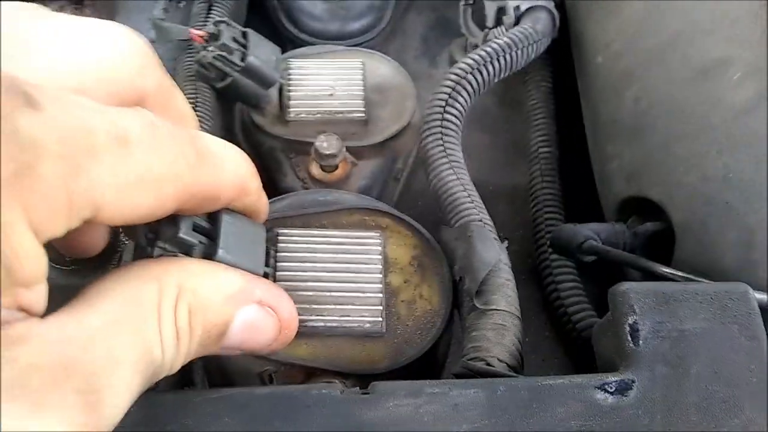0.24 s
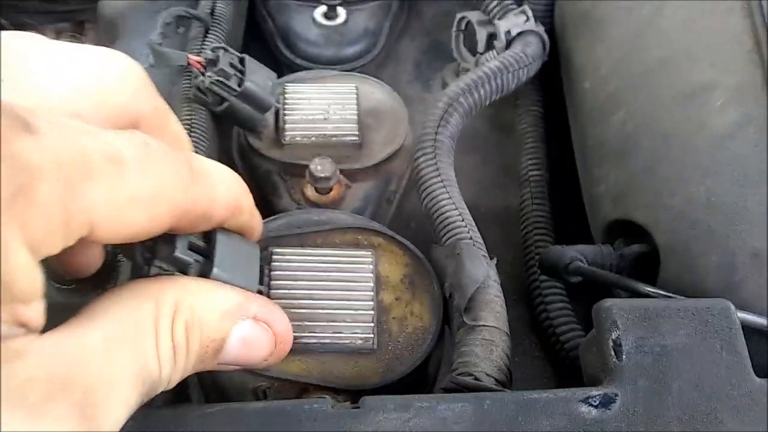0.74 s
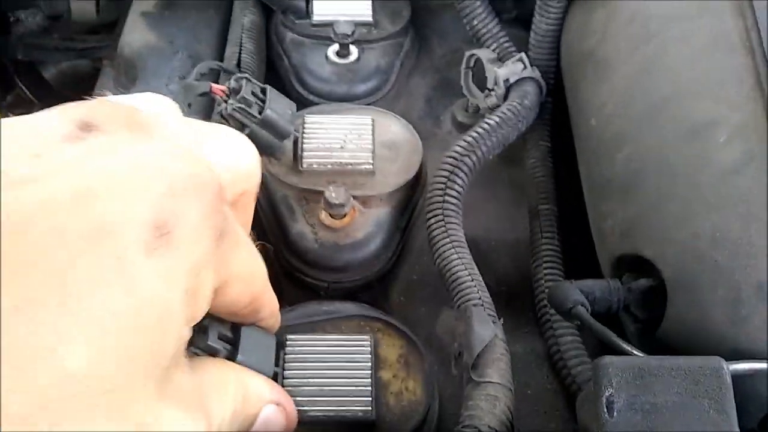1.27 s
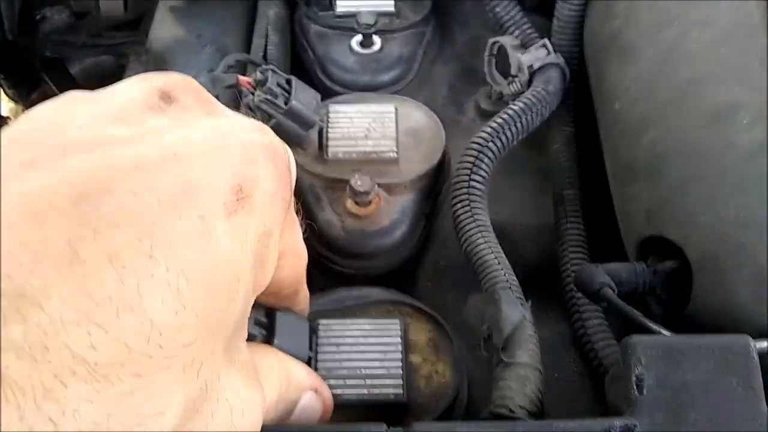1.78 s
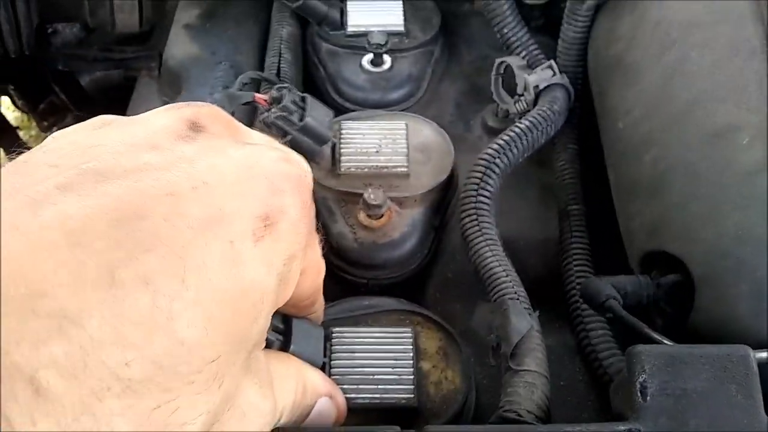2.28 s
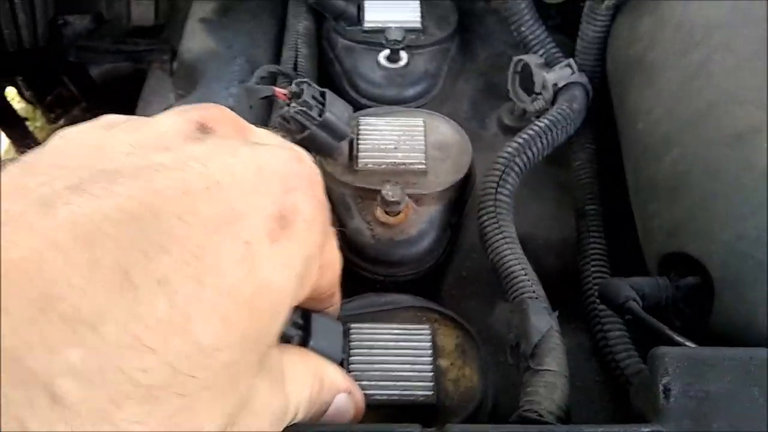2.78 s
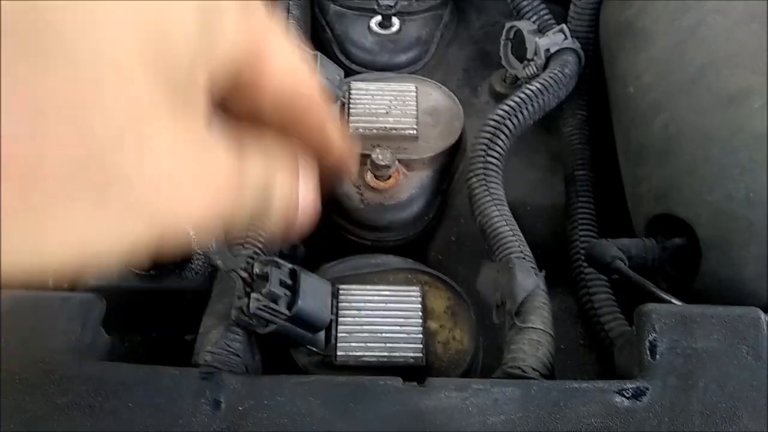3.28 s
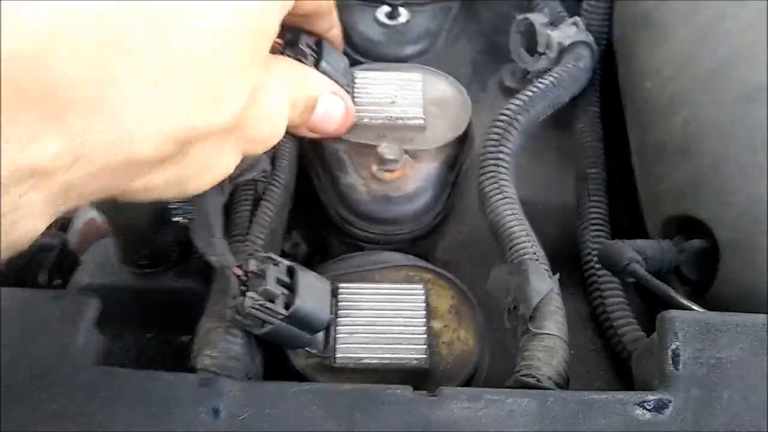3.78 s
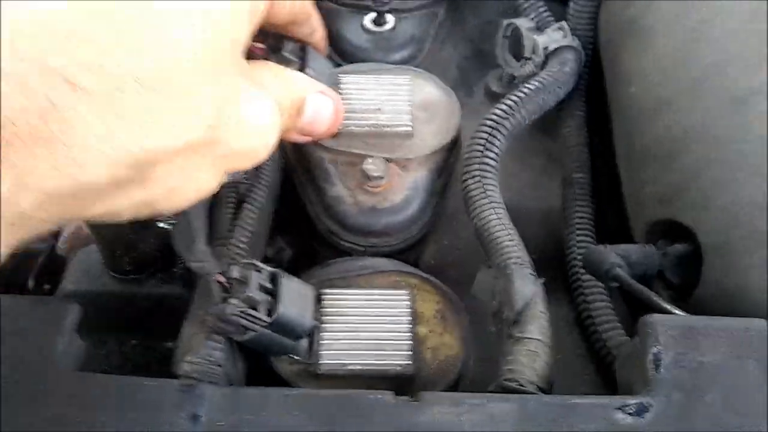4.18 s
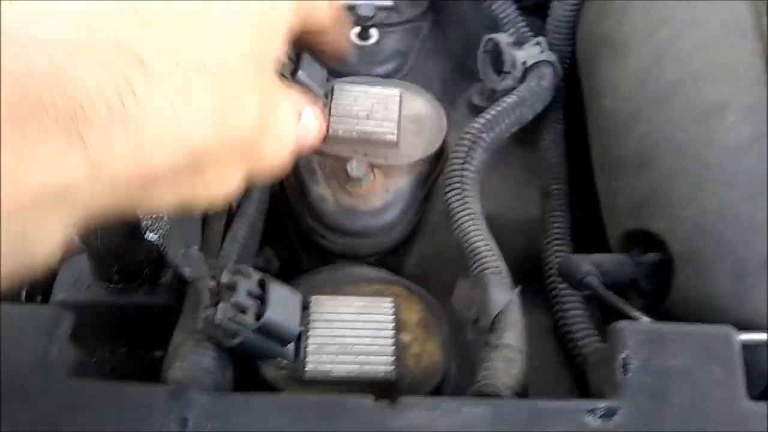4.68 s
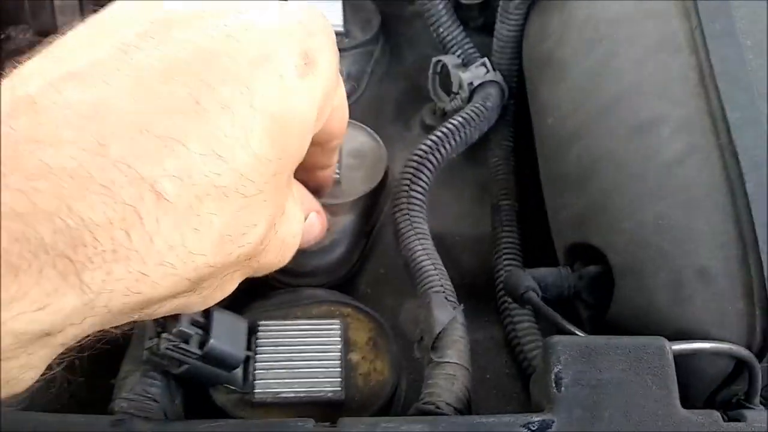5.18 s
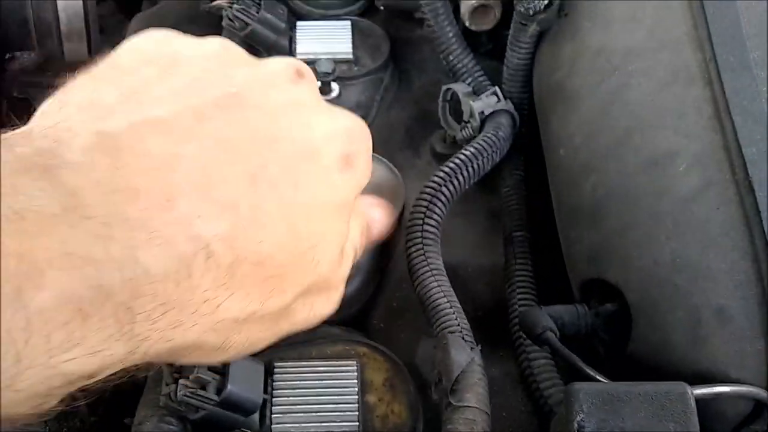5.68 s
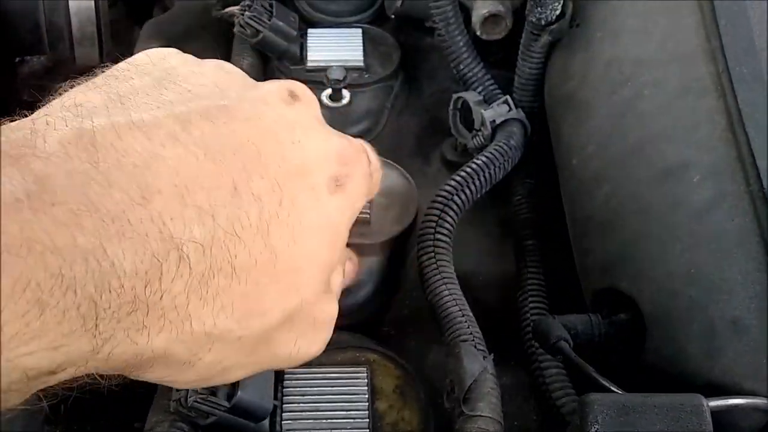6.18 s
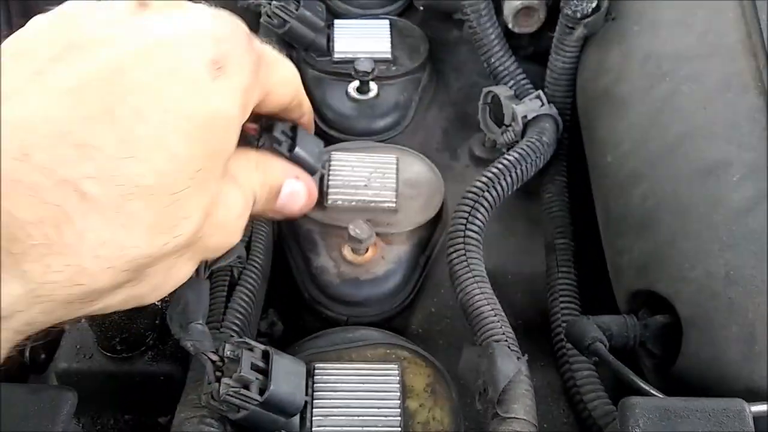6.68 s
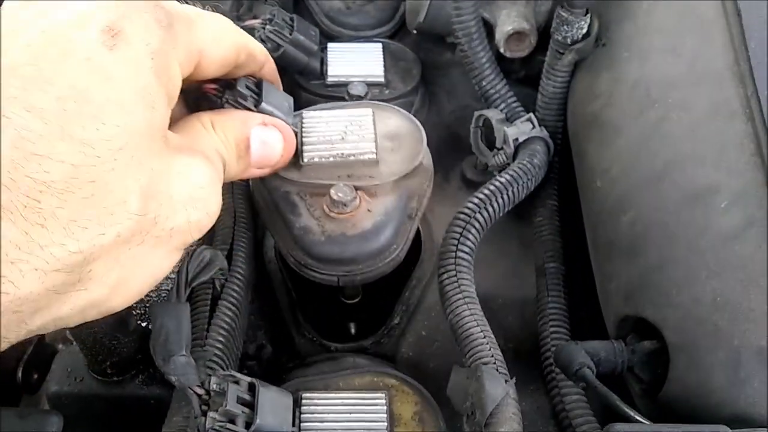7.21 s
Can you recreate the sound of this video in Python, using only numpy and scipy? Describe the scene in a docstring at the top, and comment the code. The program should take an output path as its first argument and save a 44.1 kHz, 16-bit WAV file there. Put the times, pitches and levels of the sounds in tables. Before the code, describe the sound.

A six-cylinder engine idles roughly at close range, valve gear ticking metallically, while sharp electric sparks snap in hollow wells and a plastic connector clicks home.

```python
"""A six-cylinder car engine idles unevenly under its open bonnet, close to a phone.
Its valve gear ticks around each firing and rings the cylinder head, over a throbbing exhaust note,
a droning block and hiss. A lifted ignition coil snaps sparks that ring its plug well, and rubber boots
pop. A connector clicks home, dull knocks stand out, and puffs of air touch one microphone.
The phone widens its stereo by feeding each microphone, late and inverted, to the other side."""
import sys
import numpy as np
from scipy import signal
from scipy.fft import rfft, irfft, next_fast_len
from scipy.io import wavfile
from scipy.ndimage import uniform_filter1d, map_coordinates

SR = 44100
rng = np.random.default_rng(int(sys.argv[2]) if len(sys.argv) > 2 else 0)


def unload_audio(sound):
    """Save the sound as a 16-bit wav file, at the path given as the first command line argument."""
    columns = np.transpose(np.atleast_2d(sound))
    # keep every value between -1 and 1, then stretch to whole-number steps
    steps = np.round(np.clip(columns, -1, 1) * 32767)
    wavfile.write(sys.argv[1], SR, steps.astype(np.int16))


N = 328545  # length in samples
CYLINDERS = 6  # each fires once a cycle
TICK_RISE = .72  # a tick rises in this share of the time that it takes to die

# How far the deeper misfire has set in. Each row: time in seconds, share from 0 to 1.
MISFIRE = [(0, 0), (3.2, 0), (3.9, 1), (7.45, 1)]


def amp(db):
    """Turn decibels into an amplitude factor."""
    return 10 ** (np.asarray(db) / 20)


def unit(x):
    """Scale a sound to an average power of one."""
    return x / np.sqrt(np.mean(x ** 2) + 1e-20)


def along(points, hz):
    """Read a curve of (Hz, value) points on a logarithmic frequency axis."""
    f, v = np.transpose(points)
    return np.interp(np.log(hz + 1), np.log(f + 1), v)


def curves(rows):
    """Give one value per sample for each column after the time."""
    s, *cols = np.transpose(rows)
    return [np.interp(np.arange(N) / SR, s, c) for c in cols]


def wobble(rate):
    """A smooth random curve with this many random points a second."""
    points = rng.standard_normal(int(N * rate / SR) + 4)
    return map_coordinates(points, [np.arange(N) * rate / SR])


def filtered(x, response):
    """Multiply the spectrum of x by a response that depends on frequency."""
    m = next_fast_len(N + SR // 2)
    return irfft(rfft(x, m) * response(np.fft.rfftfreq(m, 1 / SR)), m)[..., :N]


def coloured(x, spectrum):
    """Shape a sound with a curve of (Hz, dB) points."""
    return filtered(x, lambda hz: amp(along(spectrum, hz)))


def resonances(modes):
    """Response of parts that ring after a blow, from (Hz, width in Hz, dB) modes of alternating sign."""
    def response(f):
        total = 0
        for k, (centre, width, db) in enumerate(modes):
            ring = 1j * f * width / (centre * centre - f * f + 1j * f * width)
            total = total + (-1) ** k * amp(db) * ring
        return total
    return response


def pair():
    """White noise at two microphones, nearly alike in the bass because long waves reach both together."""
    # Each row: frequency in Hz, likeness at the two microphones from 0 to 1.
    likeness = [(60, 0.99), (180, 0.97), (400, 0.99), (600, 0.73), (1500, .02), (2200, 0.34), (3000, 0.062),
                (5500, 0.062), (6700, 0.17), (14000, 0.14)]

    def split(hz):
        angle = np.arccos(np.clip(along(likeness, hz), -1, 1)) / 2
        return np.array([np.cos(angle), np.sin(angle)])

    mid, side = filtered(rng.standard_normal((2, N)), split)
    return np.array([mid + side, mid - side])


def bursts(times, db, width, rise=1):
    """Envelope of short bursts that fall over a time set by width (s) and swell in rise times that."""
    power = np.bincount(np.round(times * SR).astype(int), amp(db) ** 2, N)[:N]
    t = np.arange(-2000, 2001) / SR
    shape = np.exp(-(t / np.where(t < 0, rise * width, width)) ** 2)
    return np.sqrt(np.abs(signal.fftconvolve(power, shape, "same")))


def turns(cycles, pattern):
    """A value that glides from cylinder to cylinder, and to a second pattern as the misfire deepens."""
    share = curves(MISFIRE)[0]
    place = [cycles % 1 * CYLINDERS]
    early, late = (map_coordinates(np.array(p, float), place, mode="grid-wrap") for p in pattern)
    return (1 - share) * early + share * late


def firings(cycles):
    """Number and time of each firing, found from the turning of the engine."""
    number = np.arange(2, int(cycles[-1] * CYLINDERS))
    return number, np.interp(number / CYLINDERS, cycles, np.arange(N) / SR)


def hiss(level_db):
    """Broad hiss that swells and sinks: coloured noise whose level flickers."""
    # Tone of the hiss. Each row: frequency in Hz, relative level in dB.
    tone = [(500, -49), (1500, 1.5), (2300, -4.5), (3000, 4), (5500, 9), (7000, -2.5), (10000, -4),
            (12500, -7.5), (14500, -73)]
    noise = pair() * amp(3.07 * wobble(30))
    return amp(level_db + 7) * unit(coloured(noise, tone))


def puffs():
    """Short low gusts of air: bursts of deep noise that reach the left microphone only."""
    # Each row: time in seconds, relative level in dB, width of the burst in seconds.
    gusts = [(1.68, -21, 0.0097), (3.47, -34, 0.025), (3.538, -29, 0.014), (3.595, -28, 0.018)]
    # Tone of the gusts. Each row: frequency in Hz, relative level in dB.
    tone = [(15, -24), (45, -2), (90, 1), (150, 2), (240, -6), (500, -59)]
    swell = sum(bursts(np.array([s]), [db], width) for s, db, width in gusts)
    return swell * unit(coloured(rng.standard_normal(N), tone)) * np.array([[1], [0]])


def connector():
    """A plastic connector snaps home: its latch rings briefly and rattles as it seats."""
    # Each row: time in seconds, relative level in dB.
    clicks = [(3.2349, -7.5), (3.2425, -12), (3.2496, -24), (3.2565, -23)]
    # Lower and upper edge of the rattle's band, in Hz.
    rattle_hz = [2190, 4560]
    out, t = np.zeros(N + SR), np.arange(SR // 10) / SR
    b, a = signal.butter(1, rattle_hz, 'bandpass', fs=SR)
    for s, db in clicks:
        ring = np.sin(2 * np.pi * 2200 * t) * amp(-60 * t / 0.011) * (1 - np.exp(-t / 0.00047)) ** 2
        rattle = signal.lfilter(b, a, rng.standard_normal(len(t)))
        rattle = rattle * amp(-12 - 60 * t / 0.097) * (1 - np.exp(-t / 0.0014))
        out[round(s * SR):][:len(t)] += amp(db + 14) * (ring + rattle)
    # from the side: half a wave apart at the two microphones
    return out[:N] * np.array([[-.4], [.6]])


def knocks():
    """Short dull knocks low in the block: bursts of coloured noise that stand out of the drone."""
    # Each row: time in seconds, relative level in dB.
    blows = [(1.536, -24), (4.529, -30), (4.759, -29), (5.348, -38), (5.581, -27), (5.78, -34),
             (6.147, -22.5), (6.57, -27), (6.74, -31), (6.903, -31), (7.336, -28)]
    # Tone of a knock. Each row: frequency in Hz, relative level in dB.
    tone = [(300, -19), (520, 7), (800, -5), (1080, 12.5), (1700, -12.5)]
    s, db = np.transpose(blows)
    return bursts(s, db, 0.0058, TICK_RISE) * unit(coloured(pair(), tone))


def block(cycles):
    """The block drones: noise beaten by every firing, in uneven lumps."""
    # Course of the drone. Each row: time in seconds, relative level in dB.
    drone = [(0.0, -29.5), (0.14, -34), (0.79, -33.5), (1.2, -30), (2.0, -29.5), (2.86, -29), (3.5, -31.5),
             (3.84, -29.5), (4.62, -32), (5.04, -29.5), (6.37, -31), (6.81, -29), (7.14, -34),
             (7.45, -32.5)]
    # Tone of the block. Each row: frequency in Hz, relative level in dB.
    tone = [(20, -0.5), (45, -5), (70, 3.5), (150, 2.5), (280, -7), (340, -5.5), (400, 2), (435, -3),
            (478, 0.5), (530, -2), (700, -5.5), (900, -8), (1050, -4.5), (1300, -8), (1500, -11.5),
            (2400, -16), (5000, -26)]
    # Loudness of each cylinder's turn. Two rows, before and after the misfire deepens: six values in dB.
    lump = [
        [-.6, 0.47, -2.5, -1.6, -1.8, 0.37],
        [1.5, 0.96, -2.5, -1.9, 0.72, 0.6],
    ]
    beat_db = 1.1 * np.cos(2 * np.pi * (CYLINDERS * cycles - .1)) + turns(cycles, lump)
    noise = pair() * amp(beat_db + 1.2 * wobble(60))
    return amp(curves(drone)[0] + 3.5) * unit(coloured(noise, tone))


def coil():
    """Sparks crack and ring the air in the plug well, brighter with a harder crack; boots pop hollowly."""
    # Each row: time in seconds, relative level in dB, relative level of the crack in dB,
    # factor on the pitch of the well, extra level of its hollow note in dB.
    sparks = [(0.0221, -1, -14, 1, 0), (0.2008, 0, -15, 1, 0), (0.3813, 0, -13, 1, 0),
              (0.5611, -2, -9, 1, 0), (0.7417, -1.5, -10, 1, 0), (0.922, -13, -14, .93, 4),
              (6.9643, -3, -13, 1.04, 3.5), (7.1634, -1, -16, 1.07, 4), (7.3627, -1, -11, 1.05, 4)]
    # Notes of the plug well. Each row: Hz before the pitch factor, relative level in dB,
    # time to fall by 60 dB in seconds.
    well = [(750, 5, 0.025), (900, 15, 0.0082), (1020, -0.5, 0.022), (1234, -3.5, 0.027), (3070, -5, 0.016),
            (5115, 6, 0.015), (6300, -10, 0.011), (10300, -17, 0.017), (620, -17, 0.12)]
    # Rubber boots pulled and seated. Each row: time in seconds, relative level in dB, note in Hz,
    # time to fall by 60 dB in seconds.
    pops = [(3.848, -7.5, 640, 0.036), (4.555, -8, 628, 0.039), (6.9239, 5.5, 667, 0.018)]
    out, t = np.zeros((2, N + SR)), np.arange(SR // 6) / SR
    hz = np.transpose(well)[0]
    b, a = signal.butter(1, [1800, 10800], 'bandpass', fs=SR)  # band of the crack in Hz

    for s, db, crack_db, pitch, hollow_db in sparks:
        hollow = (hz < 800) - 2. * ((hz > 950) & (hz < 2000))
        extra_db = (crack_db + 13) * (hz > 2000) + hollow_db * hollow
        extra_db = extra_db + .8 * rng.standard_normal(len(well))
        ring = 0
        for (mode, level, t60), more in zip(well, extra_db):
            ring = ring + amp(level + more - 60 * t / t60) * np.sin(2 * np.pi * pitch * mode * t)
        ring = ring * (1 - np.exp(-t / 0.00071)) ** 2
        # the crack fizzes up just after the blow
        crack = signal.lfilter(b, a, rng.standard_normal((2, len(t))))
        crack = crack * amp(crack_db + 20.5 - 60 * t / 0.019) * (1 - np.exp(-t / 0.0017)) ** 2
        out[:, round(s * SR):][:, :len(t)] += amp(db - 11.5) * (ring + crack)

    for s, db, note_hz, t60 in pops:
        swing = 2 * np.pi * note_hz * t
        # a lopsided swing adds a weak overtone
        note = amp(-60 * t / t60) * (1 + 0.12 * np.cos(swing)) * np.sin(swing)
        out[:, round(s * SR):][:, :len(t)] += amp(db - 4) * note * (1 - np.exp(-t / 0.00046)) ** 2
    return out[:, :N] * amp([[-1.5], [1.5]])


def cycle_click(cycles):
    """A faint click comes once a cycle, with one cylinder's firing: a short noise burst through one resonance."""
    # Each row: frequency in Hz, width in Hz, relative level in dB.
    ring = [(2910, 190, 0)]
    number, s = firings(cycles)
    s = s[number % CYLINDERS == 2]  # cylinder 2, counting from 0
    level_db = -20.5 + 1.7 * rng.standard_normal(len(s))
    return filtered(pair() * bursts(s, level_db, 0.0079), resonances(ring))


def thumps(cycles):
    """Under the deeper misfire, firings strike the pipe's low resonance, some far harder than others."""
    # Resonance of the pipe, applied twice. Each row: frequency in Hz, width in Hz, relative level in dB.
    pipe = [(127.8, 30, 0)]
    # Relative strength of each cylinder's thump in dB.
    strength_db = [14, 31, 12, 35.3, 10, 23]
    number, s = firings(cycles)
    at = np.round((s - 0.00794) * SR).astype(int)  # seconds ahead of the firing mark
    size_db = np.array(strength_db)[number % CYLINDERS] + 0.44 * rng.standard_normal(len(s))
    size = amp(size_db) * curves(MISFIRE)[0][at]
    return filtered(np.bincount(at, size, N), lambda hz: resonances(pipe)(hz) ** 2)


def exhaust(cycles, db):
    """Exhaust pulses add up to multiples of the firing rate; unequal cylinders make them throb."""
    # Each row: multiple of the firing rate, relative level in dB.
    orders = [(2, -14), (3, 1.5), (4, -0.5), (5, -14), (7, -23.5)]
    # Loudness of each cylinder's turn in the multiples below 4, then in the higher ones.
    # Two rows each, before and after the misfire deepens: six values in dB.
    low_throb = [
        [.5, 2, 0, -3, -.5, .3],
        [-3.5, 2.5, -.5, -4, 3, -2],
    ]
    high_throb = [
        [.5, -2, -5, -1.5, 1.5, 2],
        [-8, -6, -8, -6, -6, -6],
    ]
    # The crank runs ahead and falls back. Two rows, as above: six values in radians of a firing.
    surge = [
        [0, 0.13, 0.25, 0.02, -0.03, -0.14],
        [0, 0.11, 0.42, -0.091, -0.24, -0.062],
    ]
    firing = 2 * np.pi * CYLINDERS * cycles + turns(cycles, surge)
    note = 0
    for order, level in orders:
        throb = turns(cycles, low_throb if order < 4 else high_throb)
        loudness = amp(level + throb + 0.32 * wobble(6.8))
        note = note + loudness * np.sin(int(order) * firing + 1.33 * wobble(4.3))
    return amp(db) * unit(note)


def ticks(cycles):
    """One tick a firing, sized by cylinder and chance; placed ticks replace the nearest ordinary ones."""
    # Ordinary ticks. Each row: time in seconds, then relative levels in dB of high ring, low ring, clatter.
    ordinary = [(0.28, -62, -64, -44), (0.78, -36, -48, -41), (1.4, -33, -47, -38.5),
                (2.2, -37, -42, -36.5), (2.95, -32, -36, -36.5), (3.65, -34, -49, -36.5),
                (4.4, -28, -46, -32), (5.2, -28, -55, -35.5), (5.95, -35, -36, -29.5),
                (6.6, -25.5, -37.5, -36), (7.18, -35, -43, -39)]
    # One row a cylinder: lag in firings, then extra dB of high ring, low ring and clatter.
    by_cylinder = [(0.02, 3, 3, 3), (0, 2, 1, 1), (0.03, -5, -3, -5), (0.03, -1, -3, -2), (0.08, 1, 0, 0),
                   (0.04, 1, 3, 1)]
    # Ticks with their own time and levels, mostly loud, some soft.
    # Each row: time in seconds, then relative levels in dB as for ordinary ticks.
    placed_ticks = [(0.003, -22, -40, -39), (0.12, -26, -42, -36), (0.185, -24, -43, -35),
                    (0.324, -25, -50, -36), (0.479, -18, -37, -34), (0.629, -21, -40, -37),
                    (0.661, -16, -52, -39), (0.84, -18, -49, -44), (0.96, -27, -38, -37),
                    (1.015, -23, -34, -30), (1.047, -19.5, -37, -35), (1.08, -21, -38, -36),
                    (1.258, -19.5, -42, -33), (1.38, -14, -37, -31), (1.412, -16, -48, -36),
                    (1.535, -22, -41, -41), (1.562, -17.5, -44, -29.5), (1.598, -19, -31, -29.5),
                    (1.626, -23, -32, -29), (1.75, -15.5, -41, -30), (1.778, -21, -35, -31.5),
                    (1.913, -22, -31, -31.5), (1.939, -24, -45, -30), (1.993, -32, -39, -31),
                    (2.06, -29, -37, -30), (2.089, -20.5, -32, -28.5), (2.122, -35, -33, -31),
                    (2.38, -23.5, -37, -44), (2.512, -25, -31, -32.5), (2.562, -25, -34, -35),
                    (2.601, -22, -35, -36), (2.635, -22, -43, -34), (2.693, -24, -30, -37),
                    (2.726, -21, -37, -36), (2.85, -15.5, -35, -28.5), (2.878, -26, -30, -30),
                    (3.038, -26, -30.5, -34), (3.066, -29, -36, -32), (3.1, -22, -38, -36),
                    (3.156, -22, -25, -30), (3.218, -20, -30, -28), (3.284, -22, -37, -31.5),
                    (3.375, -16.5, -34, -31), (3.479, -28, -37, -33.5), (3.598, -24, -36, -33),
                    (3.657, -19, -42, -35), (3.76, -23, -36, -30), (3.785, -19.5, -38, -30),
                    (3.815, -14, -32, -31), (3.846, -14, -47, -28), (3.915, -18, -41, -34),
                    (3.946, -16, -35, -32), (3.975, -13, -35, -29), (4.007, -23, -36, -29),
                    (4.04, -20, -37, -33), (4.065, -17, -47, -37), (4.14, -21, -39, -36),
                    (4.175, -25, -38, -38), (4.203, -19, -42, -33), (4.237, -18, -38, -34),
                    (4.337, -17, -37, -29.5), (4.366, -13, -33, -22.5), (4.396, -17, -37, -30),
                    (4.426, -18, -31, -28), (4.496, -28, -36, -34), (4.558, -19, -30.5, -27),
                    (4.595, -12, -37, -29), (4.626, -14.5, -49, -35), (4.7, -30, -49, -38),
                    (4.758, -11.5, -31.5, -29), (4.822, -8, -29, -27), (4.853, -23, -43, -38),
                    (4.919, -17, -36, -29.5), (4.952, -18.5, -38, -28), (4.985, -15.5, -34, -27.5),
                    (5.012, -13, -31, -29), (5.086, -18, -29.5, -28), (5.122, -25, -41, -40),
                    (5.151, -15, -37, -30), (5.184, -10.5, -39, -29), (5.217, -20, -40, -33),
                    (5.32, -16.5, -38, -33), (5.35, -12, -34, -33), (5.385, -25, -38, -36),
                    (5.415, -20, -39, -33), (5.482, -13, -27.5, -32.5), (5.518, -25, -43, -33),
                    (5.547, -15, -35, -29), (5.581, -16, -38, -25.5), (5.615, -17, -35, -31),
                    (5.714, -16, -36, -26.5), (5.743, -18, -29, -30), (5.78, -11, -31.5, -27),
                    (5.882, -16, -37, -31), (5.911, -17, -37, -34), (5.942, -13, -38, -30),
                    (5.977, -16, -38, -30.5), (6.006, -17, -33, -28.5), (6.078, -18, -31, -32),
                    (6.11, -10, -31, -25), (6.142, -16, -28, -34), (6.18, -17, -31, -25.5),
                    (6.22, -26, -42, -36), (6.367, -20, -27, -27), (6.401, -15, -36, -32),
                    (6.572, -14.5, -26, -28.5), (6.614, -38, -53, -47), (6.739, -18, -27.5, -29),
                    (6.767, -21, -32, -30), (6.799, -19, -28, -28.5), (6.899, -16, -29.5, -27),
                    (6.975, -15, -38, -31), (7.005, -27, -41, -34), (7.075, -23, -40, -36),
                    (7.17, -18.5, -36, -30), (7.205, -25, -39, -32), (7.275, -25, -42, -37),
                    (7.305, -21, -40, -34), (7.343, -23, -35, -37), (7.368, -16.5, -34, -28),
                    (7.4, -19, -36, -32)]
    # Size of the scatter from tick to tick, in dB: high ring, low ring, clatter.
    scatter_db = [3, 2.5, 2]
    shared, jitter_s = .6, .003  # part of the scatter common to the layers; scatter in time

    number, s = firings(cycles)
    cylinder = number % CYLINDERS
    lag, *extra_db = np.transpose(by_cylinder)
    chance = rng.standard_normal((len(s), 5))
    mixed = shared * chance[:, :1] + np.sqrt(1 - shared ** 2) * chance[:, 1:4]
    mixed = np.minimum(mixed, 1)  # strays further towards soft than towards loud
    when, *ordinary_db = np.transpose(ordinary)
    db = [np.interp(s, when, a) + b[cylinder] for a, b in zip(ordinary_db, extra_db)]
    db = db + (mixed * scatter_db).T
    tick_s = s + lag[cylinder] * np.gradient(s) + jitter_s * chance[:, -1]
    rows = np.vstack([tick_s, db]).T

    placed = np.array(placed_ticks)
    nearest = np.abs(s[:, None] - placed[:, 0]).argmin(axis=0)
    return np.vstack([np.delete(rows, nearest, axis=0), placed])


def valves(cycles):
    """Valve gear ticks: each is a brief rattle that rings the head and cover and clatters broadly."""
    # Notes of the cylinder head, high and low, then thin metal, then the valve cover (applied twice).
    # Each row: frequency in Hz, width in Hz, relative level in dB.
    high_ring = [(5536, 57, 2.5), (5440, 120, 4.5), (5600, 110, 1.5), (5310, 240, -9.5)]
    low_ring = [(3787, 53, 0.5), (3706, 64, -2.5), (4000, 310, -15)]
    thin_ring = [(7230, 320, -1), (9480, 930, -2), (12070, 370, -5.5)]
    cover_ring = [(2200, 45, 0)]
    # Tone of the clatter. Each row: frequency in Hz, relative level in dB.
    clatter_tone = [(600, -33), (1200, 4.5), (2300, 3), (3000, 3.5), (7000, 6), (10000, -25), (13200, -31),
                    (14500, -45)]

    s, high_db, low_db, clatter_db = ticks(cycles).T
    s = s + 0.00051
    grit = amp(2.65 * wobble(400))  # a rattle is several contacts

    # each tick rattles on 0.01 s later, over a faint steady ringing
    swell = bursts(s, high_db + 13.5, .0046, TICK_RISE) + bursts(s + .01, high_db + 3, .01) + amp(-24)
    # part of a tick rings the head's first high note as one clean swell
    drift = 1.87 * wobble(55) + 0.87 * np.array([wobble(40), wobble(40)])
    clean = amp(-21.5) * np.sin(2 * np.pi * high_ring[0][0] * np.arange(N) / SR + drift)
    high = filtered(amp(-12.5) * pair() * grit * swell, resonances(high_ring)) + clean * swell

    low_swell = bursts(s, low_db + 22.5, 0.011, TICK_RISE) + amp(-47)
    low = filtered(pair() * grit * low_swell, resonances(low_ring))

    cover_noise = rng.standard_normal(N) * (bursts(s, low_db + 24, 0.015) + amp(-22.5))
    cover = filtered(cover_noise, lambda hz: amp(6.5) * resonances(cover_ring)(hz) ** 2)

    rattle = pair() * grit * (bursts(s, clatter_db + 0.5, 0.0093, TICK_RISE) + amp(-57.5))
    clatter = amp(-2) * coloured(rattle, clatter_tone)
    thin = amp(6.5) * filtered(rattle, resonances(thin_ring))
    return high + low + cover + clatter + thin


def scene():
    """Turn the crank, add up the sounds of the engine bay and carry them to the two microphones."""
    # Progress of the engine. Each row: time in seconds, cycles turned.
    crank = [(-0.03, 0), (0.509, 3), (1.108, 6.333), (1.658, 9.333), (2.21, 12.333), (2.94, 16.333),
             (3.31, 18.333), (3.691, 20.333), (4.465, 24.333), (4.858, 26.333), (5.649, 30.333),
             (6.836, 36.333), (7.64, 40.333)]
    # Each row: time in seconds, relative level of the exhaust in dB, relative level of the hiss in dB.
    levels = [(0.0, -45.5, -46.5), (0.89, -48, -45), (1.41, -41.5, -42), (2.74, -41, -42.5),
              (3.46, -41.5, -45.5), (3.92, -38, -39.5), (4.15, -41.5, -43.5), (6.81, -44, -40),
              (6.91, -40, -35.5), (6.97, -48, -46.5), (7.45, -47, -43.5)]
    # Balance of the microphones. Each row: frequency in Hz, left minus right in dB.
    balance = [(60, -3.5), (130, 0.5), (300, 5), (700, -4), (2000, 2), (5500, 2.5), (9500, 12.5),
               (14000, -0.5)]

    cycles = uniform_filter1d(curves(crank)[0], size=4001)  # smooth the changes of speed
    exhaust_db, hiss_db = curves(levels)
    bay = hiss(hiss_db) + connector() + knocks() + block(cycles) + coil()
    bay = bay + cycle_click(cycles) + thumps(cycles) + exhaust(cycles, exhaust_db + 13.5) + valves(cycles)

    def paths(hz):
        tilt_db = along(balance, hz) / 2
        # the right microphone hears the engine a little earlier
        return np.array([amp(tilt_db) * np.exp(-2j * np.pi * hz * .00007), amp(-tilt_db)])

    return filtered(bay, paths) + puffs()


def record(dry):
    """The phone widens the stereo, ducks its gain after loud snaps, rounds peaks and limits the band."""
    # Each row: frequency in Hz, share of each microphone fed to the other side.
    cross = [(1000, .9), (2300, .95), (3500, .94), (5500, .72), (14000, .6)]
    # Upper limit of the band. Each row: frequency in Hz, level in dB.
    edge = [(14200, 0), (14400, -24), (15000, -52), (15500, -66), (15800, -120)]
    duck_above, duck_depth, duck_s = 0.48, 0.036, 0.13  # peak level, strength, recovery in seconds
    full_scale = .92

    late = filtered(dry[::-1], lambda hz: along(cross, hz) * np.exp(-2j * np.pi * hz * .000446))
    wide = amp(-2.5) * (dry - late)
    over = np.maximum(np.abs(wide).max(axis=0) - duck_above, 0)
    pull = signal.lfilter([1], [1, -np.exp(-1 / (duck_s * SR))], over)
    wide = wide / (1 + duck_depth * pull)
    rounded = wide / (1 + np.abs(wide / full_scale) ** 5) ** (1 / 5)
    return filtered(rounded, lambda hz: amp(along(edge, hz)))


dry = scene()
out = record(dry)
unload_audio(out)
```